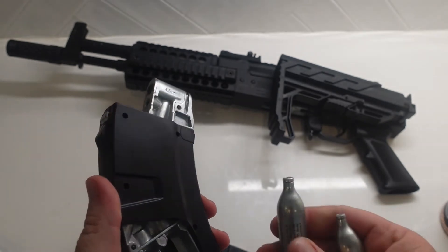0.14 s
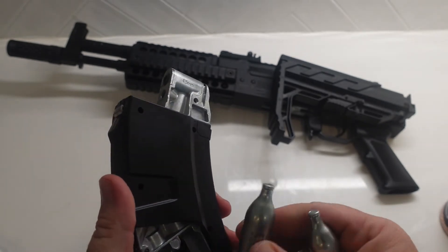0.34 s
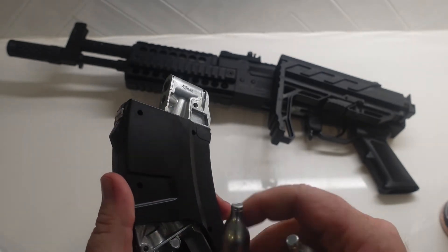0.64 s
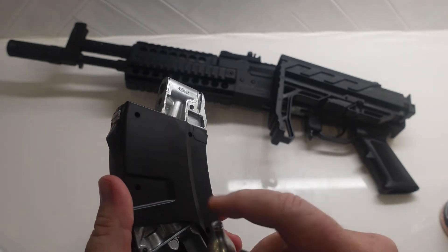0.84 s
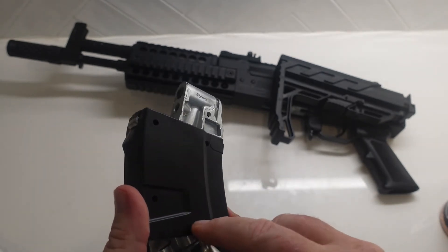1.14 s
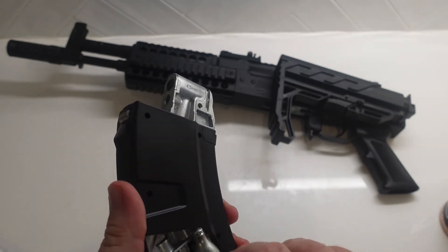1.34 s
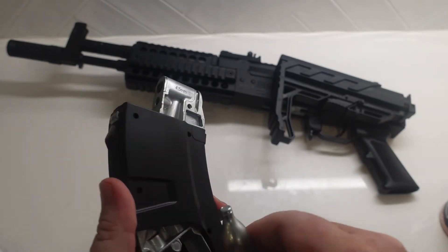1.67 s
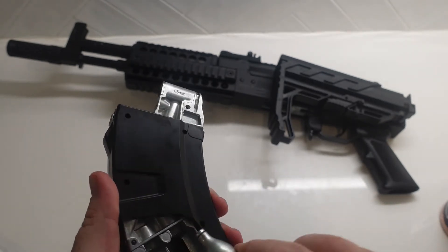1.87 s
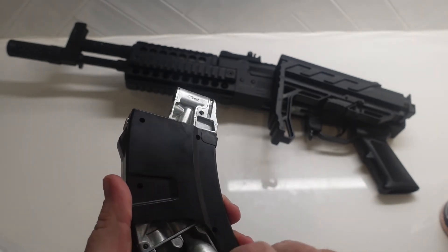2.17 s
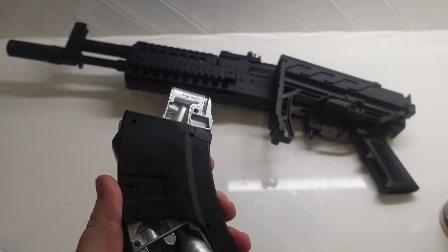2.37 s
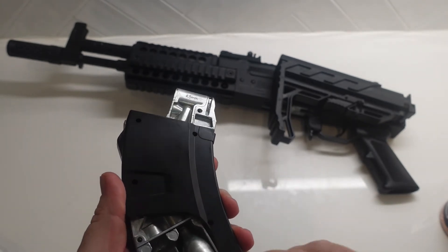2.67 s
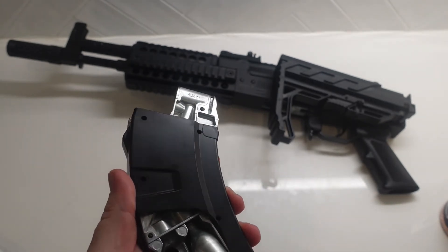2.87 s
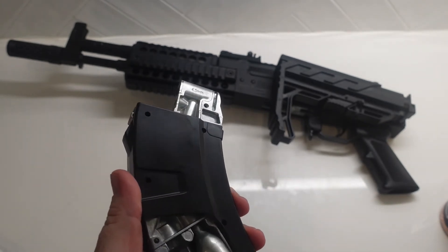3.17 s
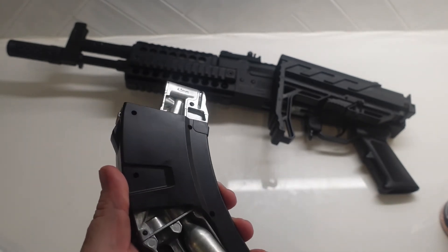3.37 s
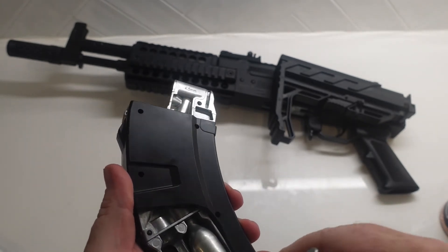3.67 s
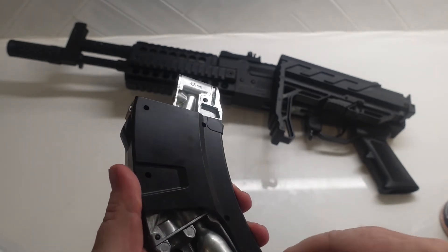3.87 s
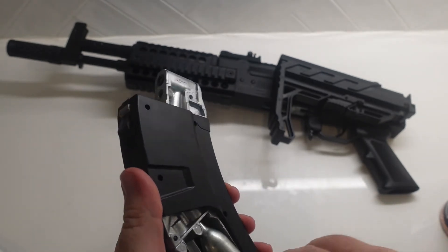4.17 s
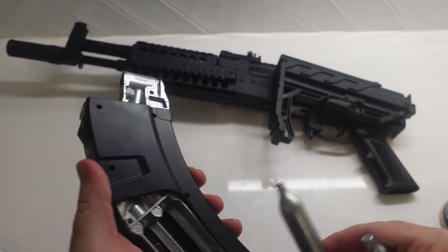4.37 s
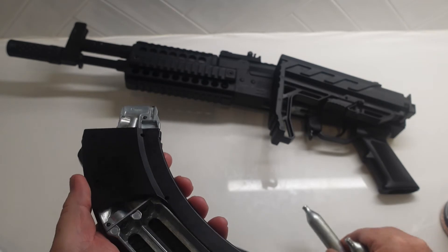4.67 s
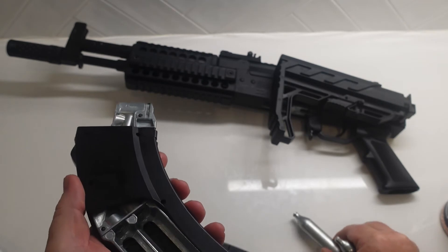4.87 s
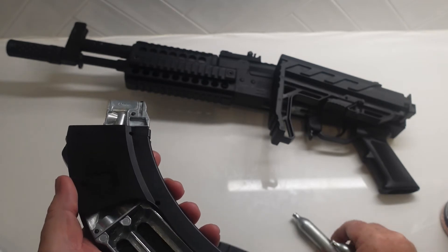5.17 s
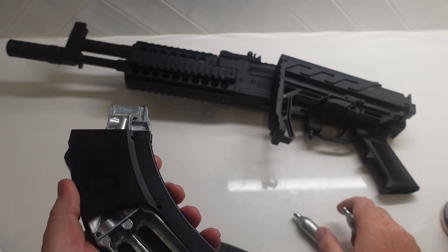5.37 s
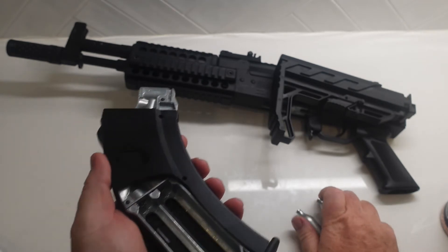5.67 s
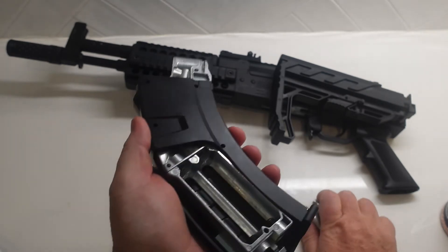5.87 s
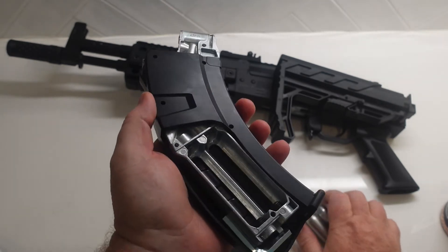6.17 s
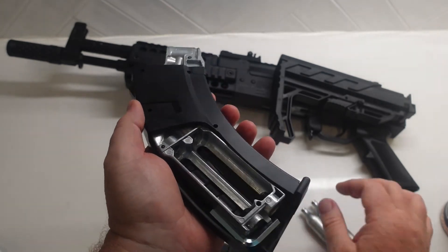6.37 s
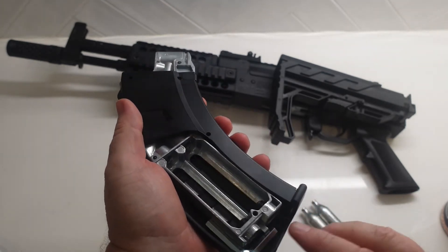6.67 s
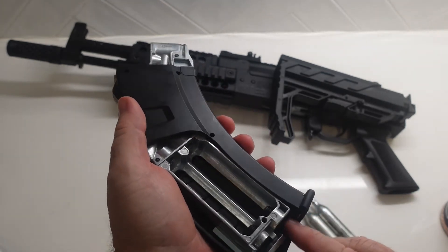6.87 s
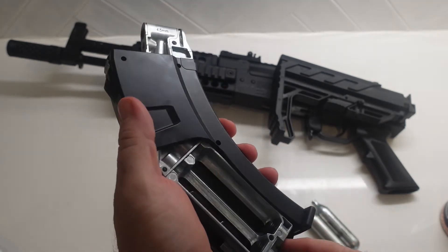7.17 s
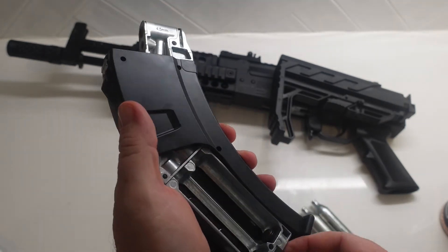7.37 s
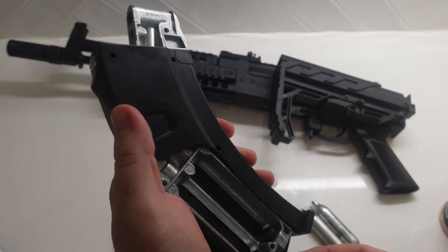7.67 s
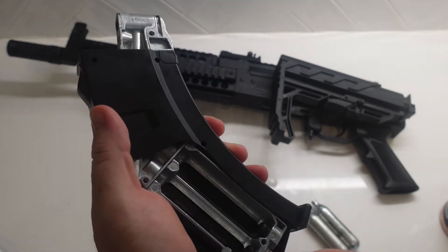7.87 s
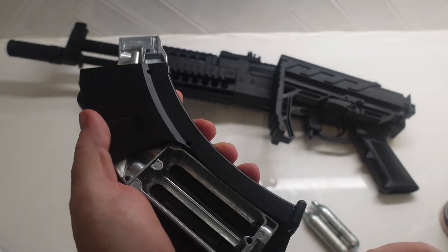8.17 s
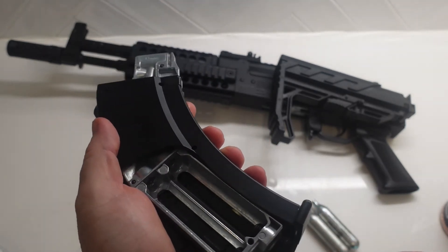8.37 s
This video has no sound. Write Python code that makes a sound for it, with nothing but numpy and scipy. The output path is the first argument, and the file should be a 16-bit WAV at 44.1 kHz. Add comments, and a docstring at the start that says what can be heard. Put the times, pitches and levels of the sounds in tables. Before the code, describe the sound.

A small steel gas cartridge clicks and knocks against a plastic and metal gun magazine in irregular clusters, now and then with a thin, high ring. Cartridges are then put down on a hard table, where they bounce quickly and clink together. Fingers tap and rub the magazine towards the end. The sounds are close, in a small bare room with a faint appliance hum.

```python
"""Gas cartridges in a magazine and on a table

Two small steel cartridges are tried in a plastic and metal magazine, exciting its damped modes and their
own thin walls. Dropped on a hard table top, they bounce ever faster and clink together; fingers tap and
rub the magazine. A small bare room with a faint appliance hum is heard through automatic gain control."""
import sys
import numpy as np
from scipy import signal
from scipy.fft import rfft, irfft
from scipy.io import wavfile
from scipy.ndimage import uniform_filter1d

SR = 44100
rng = np.random.default_rng(int(sys.argv[2]) if len(sys.argv) > 2 else 0)


def pcm_store(signal):
    """Save signal as 16-bit PCM."""
    levels = np.round(np.clip(np.atleast_2d(signal), -1, 1) * 32767)
    wavfile.write(sys.argv[1], SR, levels.astype(np.int16).T)


N = 375732

# lowest wall mode of the first cartridge, split into a pair: f/Hz, level/dB, t60/s
FIRST_WALL_MODES = [(7617, 0, .16), (7682, -2, .18)]
# upper wall modes of the cartridges: f/Hz, level/dB, t60/s
UPPER_WALL_MODES = [(10025, 0, .11), (10810, -10, .09), (11330, -5, .12), (12795, -5, .12),
                    (15220, -10, .08)]


def amp(db):
    """Amplitude ratio of a level in decibels."""
    return 10 ** (np.asarray(db) / 20)


def unit_rms(x):
    """Normalisation to unit power."""
    return x / np.sqrt(np.mean(x ** 2) + 1e-20)


def envelope(points):
    """Amplitude envelope, linear in decibels between (t/s, level/dB) points."""
    return amp(np.interp(np.arange(N) / SR, *np.transpose(points)))


def at_hz(points, hz):
    """Interpolation on a logarithmic frequency axis."""
    frequencies, values = np.transpose(points)
    return np.interp(np.log(np.maximum(hz, 1)), np.log(frequencies), values)


def butter(x, hz, kind="band", order=4):
    """Butterworth filter: a maximally flat passband."""
    return signal.sosfilt(signal.butter(order, hz, kind, fs=SR, output="sos"), x)


def decay_time(width_hz):
    """A resonance's t60/s is inversely proportional to its bandwidth."""
    return 3 * np.log(10) / (np.pi * width_hz)


def ring(force, hz, t60):
    """Damped oscillator: its impulse response is an exponentially decaying sine."""
    radius, angle = amp(-60 / (t60 * SR)), 2 * np.pi * hz / SR
    return signal.lfilter([0, np.sin(angle)], [1, -2 * radius * np.cos(angle), radius ** 2], force + 1e-18)


def impulses(times, sizes):
    """Ideal impacts: forces one sample long."""
    return np.bincount(np.round(np.asarray(times) * SR).astype(int), sizes, N)


def room_air():
    """Stationary coloured noise, partly coherent between the two channels."""
    spectrum = [(24, -61.5), (42, -43), (124, -7), (151, -43.5), (262, -3.5), (529, -11.5), (663, -8),
                (1210, -3), (1590, -6.5), (2380, -9.5), (16000, -35.5)]  # noise density: f/Hz, relative level/dB
    colour = amp(at_hz(spectrum, np.fft.rfftfreq(N, 1 / SR)))
    mid, side = irfft(rfft(rng.standard_normal((2, N))) * colour, N)
    side = amp(-3) * signal.lfilter([1, -1], [1, -.9], side)
    return amp(-56) * unit_rms(mid + side * [[1], [-1]])


def motor_hum():
    """Narrow-band noise: each line of the hum wavers at a rate set by its bandwidth."""
    lines = [(57.1, 3.2, -81), (97.3, 2.7, -74), (121.55, 2, -72), (261, 10.5, -67.5)]  # spectral lines: f/Hz, bandwidth/Hz, rms level/dB
    hum = 0
    for hz, width_hz, db in lines:
        line = ring(rng.standard_normal(N + SR), hz, decay_time(width_hz))
        hum = hum + amp(db) * unit_rms(line[SR:])  # steady state after 1 s
    return hum


def whistle():
    """Noise confined to a narrow band has an airy pitch; it comes up faintly near the end."""
    levels = [(5, -76), (6.6, -69), (7.5, -57), (8.5, -62.5)]  # swell of the whistle: t/s, level/dB
    return envelope(levels) * unit_rms(butter(rng.standard_normal(N), (4050, 4300), order=1))


def rubbing():
    """Friction of fingers and steel on the magazine: a force of sparse, uneven micro-impacts."""
    levels = [(0.0, -68.5), (1.47, -62), (4.29, -54), (5.69, -63.5), (5.93, -35), (6.36, -68), (7.45, -55),
              (7.6, -42.5), (7.7, -69), (8.52, -59.5)]  # friction force: t/s, level/dB
    grains = rng.standard_normal(N) * amp(2.1 * np.minimum(rng.exponential(1, N), 5))
    return envelope(levels) * unit_rms(grains * (rng.random(N) < .15))


def sliding_skin():
    """Sliding friction of skin on steel and plastic gives Gaussian swells of bright hiss."""
    strokes = [(0.172, 0.029, -63), (0.545, 0.04, -70), (4.387, 0.027, -62), (7.17, 0.17, -63),
               (7.555, 0.11, -60), (8.122, 0.1, -66)]  # finger strokes: centre t/s, half length/s, level/dB
    t = np.arange(N) / SR
    swells = sum(amp(db) * np.exp(-((t - centre) / half) ** 2) for centre, half, db in strokes)
    return swells * unit_rms(butter(rng.standard_normal(N), (6500, 11500), order=1))


def contacts(times, t60_ms, rise_ms):
    """Rough contacts as noise bursts that swell and decay; returns a function from gains to force."""
    age = np.arange(4096)
    age_ms = age / SR * 1000
    rise_ms, t60_ms = np.clip(rise_ms, .1, 20)[:, None], np.clip(t60_ms, 5, 300)[:, None]
    attack = np.minimum(age_ms / rise_ms, 1) ** 2
    decay = amp(-60 * np.maximum(age_ms - rise_ms, 0) / t60_ms)
    bite = 1 + 1.23 * np.exp(-age_ms)  # the first millisecond is hardest
    bursts = rng.standard_normal(decay.shape) * attack * decay * bite
    where = (np.round(times * SR).astype(int)[:, None] + age).ravel()
    return lambda gains: np.bincount(where, (gains[:, None] * bursts).ravel(), N)[:N]


def magazine():
    """Modal superposition: knocks, taps and friction drive the body; the striking point favours modes."""
    # cartridge on magazine: t/s, level/dB, tilt/(dB/octave), contact t60/ms, favoured f/Hz
    knocks = [(0.8241, -9.5, 5, 29, 1960), (0.8418, -8.5, 6.5, 34, 3760), (0.9766, -32.5, 2, 81, 2170),
              (1.0095, -32, -2.5, 140, 2370), (1.115, -13.5, -1, 28, 2420), (1.1304, -6, -1, 52, 1750),
              (1.1505, -3.5, 3.5, 102, 2190), (1.1681, -9, 7, 52, 4580), (1.4678, -21.5, 2, 360, 2420),
              (1.4829, -17, 4, 150, 3540), (1.4923, -23, -9, 184, 2310), (1.5127, -9.5, 3.5, 22, 1410),
              (1.9043, -11.5, 4.7, 136, 1900), (1.9925, -11, 9.5, 160, 2150), (2.016, -6.5, -0.5, 24, 2000),
              (2.0337, -15.5, -0.5, 260, 2190), (2.075, -17, 2, 44, 2210), (2.089, -22, 7.5, 99, 2180),
              (2.1056, -5.5, -3, 28, 2490), (2.2518, -16, -4.5, 26, 1490), (2.3674, -20.5, -1.5, 26, 1660),
              (2.3854, -9.5, 5.5, 130, 2124), (2.393, -10.5, 2, 43, 4400), (2.4246, -8.5, 3.5, 37, 5960),
              (2.4341, -4.5, 3, 94, 2400), (2.4709, -18.5, 7, 520, 5500), (2.5396, -13.5, 0.2, 41, 2440),
              (2.6991, -18, -2, 36, 2160), (2.925, -33, -0.5, 33, 1260), (3.0325, -15.5, 6, 75, 2650),
              (3.0358, -11.5, 5, 92, 2560), (3.0914, -10, 0, 48, 2140), (3.2186, -11.5, 6, 44, 2800),
              (3.2265, -6, 5.5, 20, 5480), (3.2412, -10.5, -2.5, 15, 2200), (3.3604, -3, 1.5, 7.8, 2100),
              (3.4244, -15.5, -2, 20, 2200), (3.5064, -2.5, -0.5, 22, 2050), (3.5257, -11.5, 4.5, 34, 2170),
              (3.6888, -22, -3, 18, 2780), (3.9079, -16, -2, 8.9, 2120), (3.9656, -15.5, -2.5, 230, 2110),
              (3.9818, -9, 7.5, 72, 2830), (3.998, -5, 1.5, 26, 4700), (4.0963, -9.5, 8, 142, 2720),
              (4.1508, -7.5, 4.5, 46, 3700), (4.1716, -14.5, 5, 164, 3500), (4.508, -22, -1.5, 55, 1686),
              (4.515, -27, -11, 11, 1560)]
    modes = [(536, 910, -13), (919, 69, -14.5), (1235, 105, -9), (1570, 162, -2), (1807, 280, 2.5),
             (2188, 244, -2), (2756, 337, 0), (3464, 250, -5.5), (3963, 317, -3.5), (4620, 800, 1),
             (5790, 780, -1), (6395, 568, -5)]  # body resonances: f/Hz, bandwidth/Hz, level/dB
    blows = np.vstack([np.c_[knocks, np.full(len(knocks), .3)], finger_taps()])  # steel rises in 0.3 ms
    times, level_db, tilt, t60_ms, favoured_hz, rise_ms = blows.T
    finger = np.arange(len(times)) >= len(knocks)
    force = contacts(times, t60_ms, rise_ms)
    scatter_db = 2 * rng.standard_normal((len(times), len(modes)))
    friction = rubbing()
    body = 0
    for k, (hz, width_hz, db) in enumerate(modes):
        favour_db = np.where(finger, 6, 7) * np.exp(-(np.log2(hz / favoured_hz) / .14) ** 2)
        touch_db = finger * (9.5 if hz < 740 else -3)  # a fingertip pushes the lowest mode, mutes the rest
        tilt_db = tilt * np.log2(max(hz, 950) / 2500)
        drive = force(amp(level_db - 11.5 + favour_db + touch_db + tilt_db + scatter_db[:, k])) + friction
        body = body + (-1) ** k * amp(db - 17) * ring(drive, hz, decay_time(width_hz))
    crack = amp(-6.5) * butter(force(amp(level_db - 20 + 2.14 * tilt)) + friction, (2200, 14000), order=2)
    hiss = force(amp(level_db - 48 + 2.1 * tilt + .97 * finger)) + amp(-29) * friction
    return butter(body + crack, 8050, "low") + butter(hiss, (4900, 13000), order=1)


def steel_walls(times, level_db, modes):
    """Free vibration of a shell: each blow excites every mode with a random strength and sign."""
    scatter_db = 1.8 * rng.standard_normal((len(times), len(modes)))
    signs = rng.choice([-1, 1], scatter_db.shape)
    return sum(ring(impulses(times, signs[:, k] * amp(level_db + db + scatter_db[:, k])), hz, t60)
               for k, (hz, db, t60) in enumerate(modes))


def held_cartridge():
    """Added damping: in the hand, the lowest wall modes ring 0.65 times as long as when loose."""
    clinks = [(0.84, -56, -46), (1.1307, -43, -51), (1.1515, -50, -36), (1.4847, -54, -49),
              (1.584, -60, -67), (1.9927, -57, -53), (2.389, -52, -36), (2.4252, -22.5, -39),
              (2.4334, -15.5, -34), (3.039, -57, -37.5), (3.3604, -52, -50), (3.5074, -39, -52),
              (3.9837, -29, -34), (4.0974, -54, -37)]  # knocks that ring the walls: t/s, low-mode level/dB, upper-mode level/dB
    times, low_db, upper_db = np.transpose(clinks)
    damped_modes = np.multiply(FIRST_WALL_MODES, [1, 1, .65])
    return steel_walls(times, low_db, damped_modes) + steel_walls(times, upper_db, UPPER_WALL_MODES)


def bounces(count=18, gap_ratio=.94, ring_loss_db=5.5):
    """Inelastic rebounds come ever sooner and weaker; each row holds a time and four levels."""
    # drops on the table: t/s, gap to next bounce/ms, level/dB of impact, first wall, second wall, upper modes
    drops = [(4.865, 31.3, -3.5, -28, -70, -39), (5.7335, 9, -11.5, -16, -74, -50),
             (6.0207, 20.5, -5, -48, -25, -54), (6.047, 14, -12, -55, -32, -60)]
    k = np.arange(count)
    gap_shares = gap_ratio ** k / np.sqrt(k + 1)
    fade_db = -17 * (k / count) ** 1.07
    rows = []
    for start, gap_ms, db, first_db, second_db, upper_db in drops:
        times = start + np.cumsum(np.r_[0, gap_ms * gap_shares])[:-1] / 1000
        rows.append(np.c_[times, db + fade_db, first_db - ring_loss_db * k, second_db - ring_loss_db * k,
                          upper_db - .03 * k + fade_db])
    return np.vstack(rows)


def cartridges_on_table():
    """Impacts excite the table top and the steel walls; finite contact time dulls the table's treble."""
    jostles = [(5.8753, -6, -26, -19), (5.9007, -5, -24, -19), (5.9248, -3, -45.5, -54.5),
               (5.9566, -1.5, -34, -12), (5.9665, -5.5, -33.5, -38), (5.9851, 0, -47, -61),
               (5.9975, -7, -41, -16.5)]  # cartridges jostling: t/s, level/dB of impact, first wall, second wall
    modes = [(370, -16, 0.03), (970, -9, 0.016), (1720, -4, 0.016), (2210, -3, 0.006), (3500, -1.5, 0.01),
             (4250, -3, 0.011), (5660, -3, 0.008)]  # table-top resonances: f/Hz, level/dB, t60/s
    second_wall_modes = [(7811, -3, .16), (7872, 0, .2), (12487, -27, .2), (13814, -26, .22),
                         (13894, -26, .22)]  # wall modes of the second cartridge: f/Hz, level/dB, t60/s
    jostle_upper_db = np.full(len(jostles), -41.5)
    times, level_db, first_db, second_db, upper_db = np.vstack([np.c_[jostles, jostle_upper_db], bounces()]).T
    force = contacts(times, t60_ms=np.full(len(times), 40.), rise_ms=np.ones(len(times)))
    clatter = force(amp(level_db - 23.5))
    clicks = impulses(times, amp(level_db))
    top = sum((-1) ** k * amp(db - 13.5) * ring(clicks + clatter, hz, t60)
              for k, (hz, db, t60) in enumerate(modes))
    tick = amp(9) * butter(clicks, (1500, 8000), order=2)
    rattle = amp(16.5) * butter(clatter, (2090, 6000), order=1)
    walls = (steel_walls(times, first_db, FIRST_WALL_MODES) + steel_walls(times, second_db, second_wall_modes)
             + steel_walls(times, upper_db, UPPER_WALL_MODES))
    return butter(top + tick + rattle, 5400, "low") + walls


def finger_taps(count=8, favoured_hz=4360):
    """Compliant contact lasts longer the softer the tap; rows of blows, with faint random touches added."""
    taps = [(6.7091, -30, 3.5, 0.8), (6.8, -26, 2, 7.7), (6.9062, -18.5, 2, 0.27), (6.9922, -32, -3, 0.48),
            (7.011, -10.5, -0.5, 0.45), (7.0655, -1, 5, 4.1), (7.332, -36.5, 17, 2.9),
            (7.3649, -1.5, 3.5, 1.37), (7.5178, -21.5, 0, 0.38), (7.538, -23.5, -5, 2.6),
            (7.5999, -23.5, -4.5, 0.4), (7.6147, -22.5, -5.5, 0.48), (7.6305, -5, 4.5, 1.03),
            (7.8007, -22.5, -3.5, 1.7), (7.82, -9.5, 1.5, 10.3), (7.8588, -22.5, -1.5, 0.6),
            (7.936, -18.5, 2.5, 8.6), (7.9555, -13.5, 0.5, 1.4), (7.973, -4, -.5, 7)]  # fingertips on the magazine: t/s, level/dB, tilt/(dB/octave), rise/ms
    touches = rng.uniform([7.1, -41, -15], [7.75, -35, -7], (count, 3))
    times, level_db, tilt, rise_ms = np.vstack([taps, np.c_[touches, np.ones(count)]]).T
    t60_ms = 20.5 * 2 ** (-level_db / 15.5)
    return np.c_[times, level_db, tilt, t60_ms, np.full(len(times), favoured_hz), rise_ms]


def reverberation(x):
    """Early reflections and a diffuse tail that decays band by band, partly different in each channel."""
    decay_times = [(250, 0.64), (1000, 0.78), (3000, 0.57), (6000, 0.58), (12000, 0.34)]  # reverberation time: f/Hz, t60/s
    t = np.arange(int(.75 * SR)) / SR
    tail = 0
    for low_hz in 180 * 2 ** np.arange(0, 6.5, .5):
        noise = butter(rng.standard_normal((2, len(t))), (low_hz, low_hz * 2 ** .5), order=2)
        tail = tail + noise * amp(-60 * t / at_hz(decay_times, low_hz))
    tail = tail * np.clip(t / .00043, 0, 1)
    tail = tail / np.sqrt(np.sum(tail ** 2) / 2)
    early = tail * amp(-60 * t / .055)
    mid, side = amp(-12.5) * tail + amp(-7) * early / np.sqrt(np.sum(early ** 2) / 2)
    side = amp(-6) * butter(side, (1200, 20000), order=1)
    return signal.fftconvolve(x[None], mid + side * [[1], [-1]], axes=1)[:, :N]


def scene():
    """Superposition of direct sound, reverberation and background; small sources radiate little bass."""
    in_hand = butter(magazine() + held_cartridge(), 492, "high")
    direct = in_hand + butter(cartridges_on_table(), 250, "high") + sliding_skin()
    pan = amp([[-.25], [.25]])  # slightly to the right
    return direct * pan + reverberation(direct) + room_air() + motor_hum() + whistle()


def record(dry):
    """Automatic gain control: gain falls at once on loud knocks and creeps back; a low-pass follows."""
    threshold_db, reduction_slope, release_db_per_s, cutoff_hz = -19.5, .26, 14, 16300
    level_db = 10 * np.log10(uniform_filter1d(np.mean(dry ** 2, axis=0), 128) + 1e-12)
    reduction_db = reduction_slope * np.maximum(level_db - threshold_db, 0)
    release_db = release_db_per_s * np.arange(N) / SR
    held_db = np.maximum.accumulate(reduction_db + release_db) - release_db
    gain = amp(-signal.lfilter([.02], [1, -.98], held_db))
    return signal.sosfilt(signal.cheby2(12, 70, cutoff_hz, fs=SR, output="sos"), dry * gain)


dry = scene()
out = record(dry)
pcm_store(out)
```